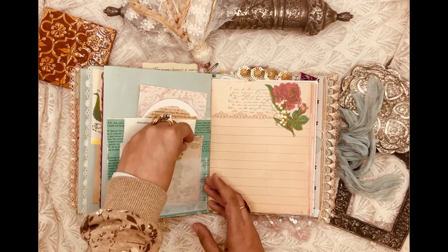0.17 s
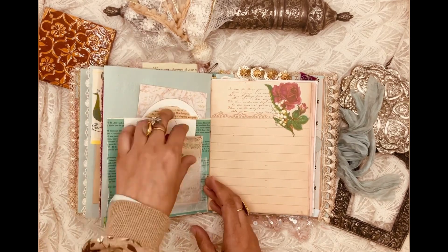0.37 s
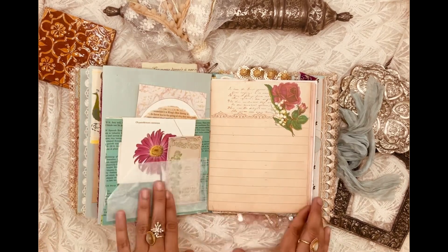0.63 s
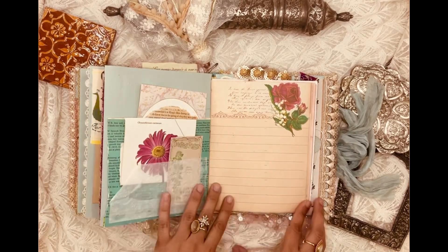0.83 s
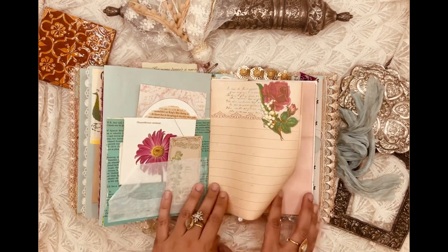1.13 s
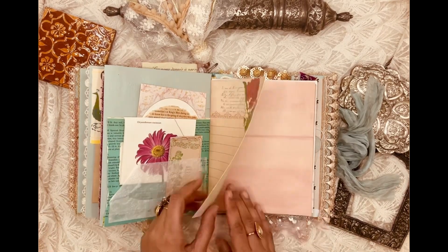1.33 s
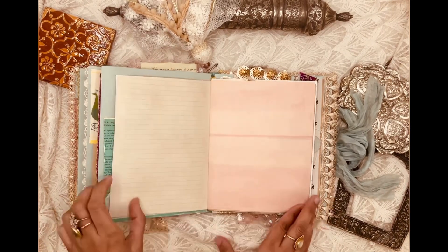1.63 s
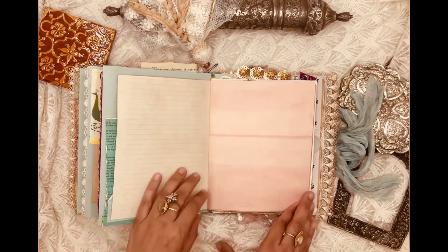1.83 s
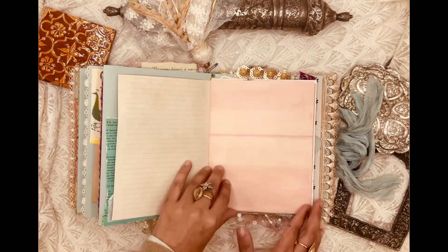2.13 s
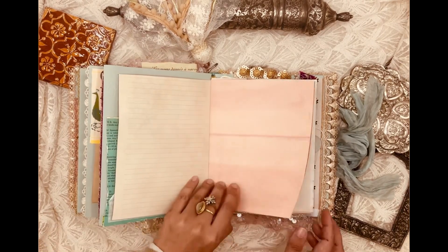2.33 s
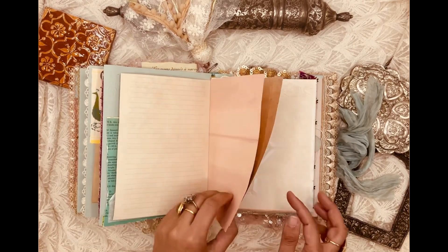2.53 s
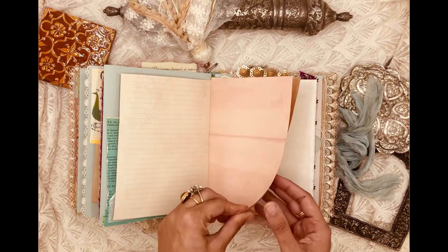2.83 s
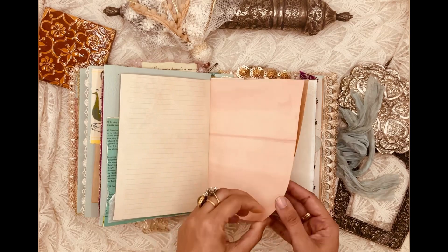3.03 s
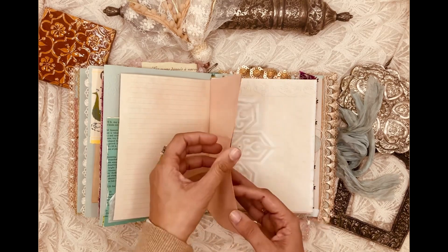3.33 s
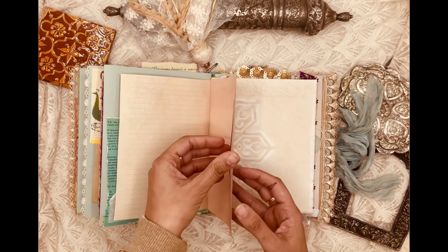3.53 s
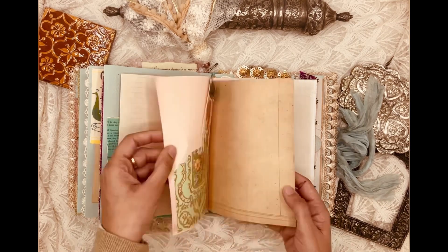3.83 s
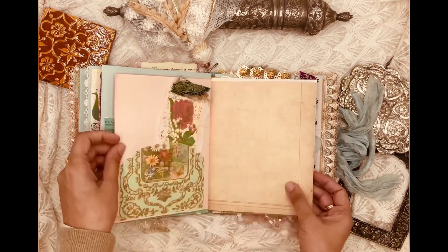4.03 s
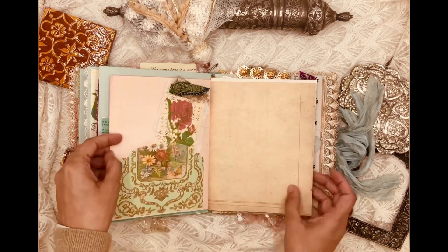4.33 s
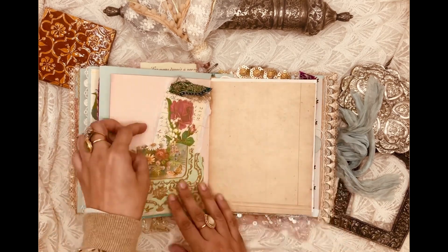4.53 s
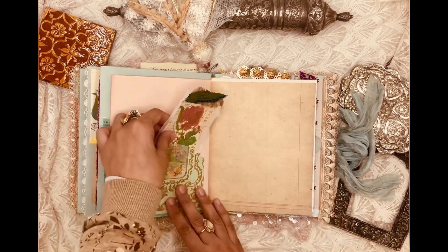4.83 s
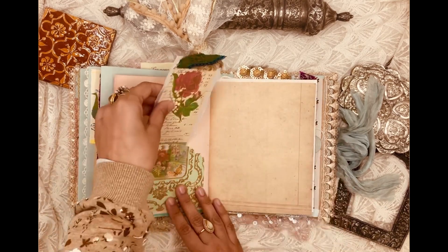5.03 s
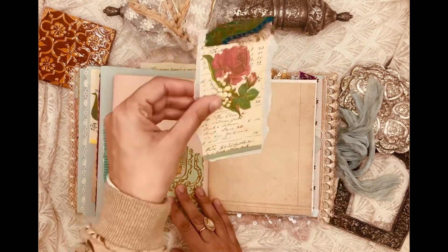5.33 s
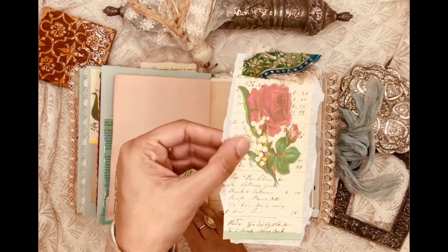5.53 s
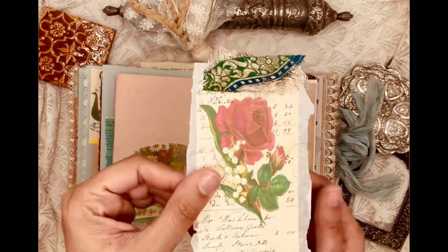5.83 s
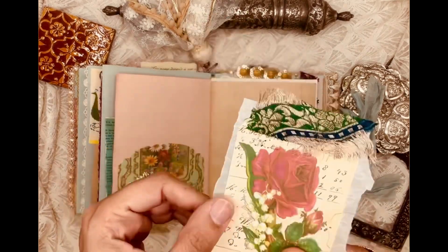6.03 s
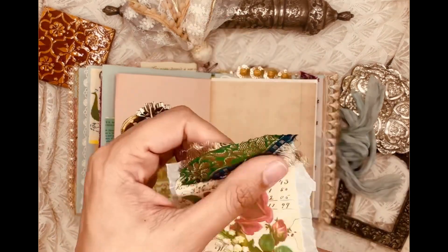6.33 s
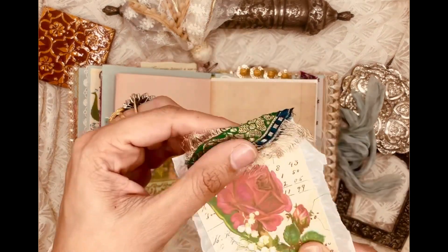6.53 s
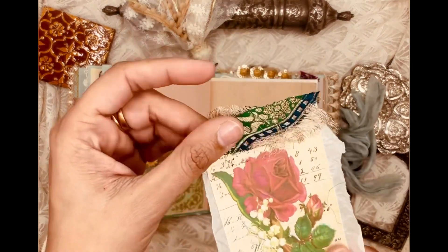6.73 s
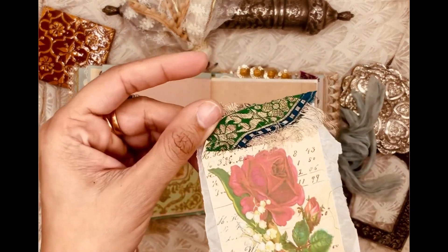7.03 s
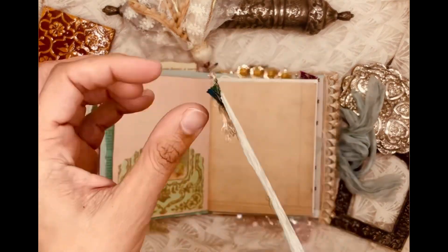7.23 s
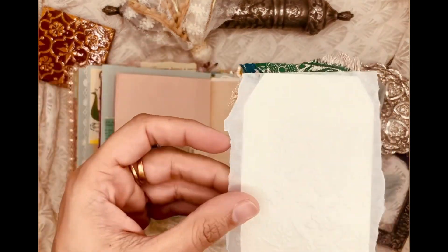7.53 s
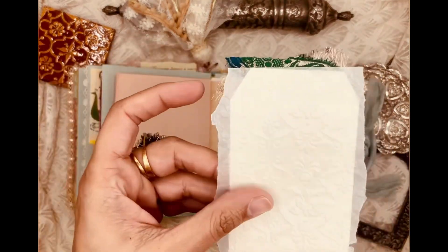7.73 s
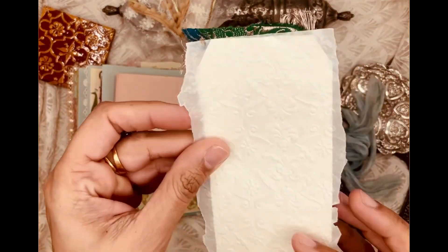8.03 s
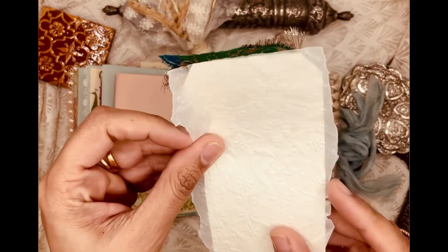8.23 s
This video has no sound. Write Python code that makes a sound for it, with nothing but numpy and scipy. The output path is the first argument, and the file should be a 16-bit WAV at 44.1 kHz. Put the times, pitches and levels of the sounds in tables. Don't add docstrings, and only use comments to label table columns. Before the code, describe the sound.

Quiet, dry paper handling on a cloth-covered table, heard close. Soft airy finger slides come first, then a loud crease snap as the page turns, more rubbing, and a crackling bend of a heavier sheet. After a quick flutter of page edges, a stiff card rustles, ticks and thuds softly, its corners cracking brightest at the end. Faint room hiss throughout.

```python
import sys
import numpy as np
from scipy import signal
from scipy.fft import rfft, irfft
from scipy.io import wavfile

SR = 44100
rng = np.random.default_rng(int(sys.argv[2]) if len(sys.argv) > 2 else 0)


def gain_from_decibels(decibels):
    exponent = np.asarray(decibels, float) / 20
    return 10 ** exponent


def materialize(psi):
    bounded = np.clip(np.atleast_2d(psi).T, -1, 1)
    quanta = np.round(bounded * 32767).astype(np.int16)
    wavfile.write(sys.argv[1], SR, quanta)


N = 369558
HOP = 40
BAND_EDGES_HZ = np.linspace(45 ** .35, 17500 ** .35, 62) ** (1 / .35)
BANDS_HZ = list(zip(BAND_EDGES_HZ, BAND_EDGES_HZ[1:]))


def at_hz(points, hz):
    points_hz, values = np.transpose(points)
    return np.interp(np.log(hz), np.log(points_hz), values)


def filtered(x, order, hz, kind):
    return signal.sosfilt(signal.butter(order, hz, kind, fs=SR, output="sos"), x)


def resonator(hz, width_hz):
    r = np.exp(-np.pi * width_hz / SR)
    return [1, -2 * r * np.cos(2 * np.pi * hz / SR), r * r]


def drift(rate_hz):
    r = np.exp(-2 * np.pi * rate_hz * HOP / SR)
    slow = signal.lfilter([1], [1, -2 * r, r * r], rng.standard_normal(N // HOP + 1002))[1000:]
    return slow / slow.std()


# hz, level_db_per_hz
ROOM_TONE = [(30, -17), (130, 9.5), (440, -9.5), (1000, -5), (2500, -10.5), (8000, -18), (16000, -29)]
ROOM_TONE_DB = -71


def room_hiss():
    noise, out = rng.standard_normal((2, N)), np.zeros(N)
    for k, (low_hz, high_hz) in enumerate(BANDS_HZ):
        level_db = ROOM_TONE_DB + at_hz(ROOM_TONE, np.sqrt(low_hz * high_hz))
        out += filtered(gain_from_decibels(level_db) * noise[k % 2], 2, [low_hz, high_hz], "band")
    return out


ZONES_HZ = [380, 1500, 4200, 11500]


def zone_weights(hz):
    share = np.array([np.interp(np.log(hz), np.log(ZONES_HZ), row) for row in np.eye(4)]) ** 2
    return share / share.sum()


ZONE_WIDTHS_HZ = [500, 2300, 5000, 8000]


def zone_density_db():
    return 10 * np.log10(SR / 2 / np.array(ZONE_WIDTHS_HZ))[:, None]


# start_s, length_s, touch_db, lift_db, airy_over_crisp_db
SLIDES = [(0.0, .035, -52, -64, 2), (.063, .04, -57, -55, 6), (.12, .105, -60, -56, .5),
          (.305, .03, -60, -58, 5), (.335, .02, -57, -55, 8), (.367, .008, -56, -57, 8),
          (.36, .07, -59, -64, 8), (.44, .11, -64, -56, 8), (.55, .25, -55, -71, 4),
          (.82, .025, -67, -68, 2), (.85, .08, -72, -78, .1), (.968, .07, -39, -41, -2),
          (1.04, .17, -43, -58, 2), (1.215, .02, -50, -45, .1), (1.25, .028, -37, -47, -22),
          (1.285, .035, -62, -66, -12), (1.33, .05, -55, -60, -1), (1.4, .065, -52, -51, .5),
          (1.465, .11, -50, -62, -3), (1.605, .045, -48, -57, 6), (1.66, .055, -68, -74, .1),
          (1.725, .26, -62, -59, 2), (1.99, .1, -63, -70, 3),
          (2.155, .25, -70, -64, 2), (2.43, .11, -45, -57, .1), (2.55, .11, -58, -62, .1),
                      (2.703, .05, -44, -55, -8), (2.76, .26, -55, -70, -5), (3.05, .12, -48, -53, -2),
                      (3.19, .03, -62, -56, -1), (3.24, .14, -51, -80, 2), (3.405, .01, -53, -56, .1),
                      (3.46, .09, -75, -84, 4), (3.67, .075, -72, -76, .1), (3.765, .13, -57, -53, -1),
                      (3.93, .18, -56, -72, .1), (4.13, .07, -66, -73, -1), (4.2, .1, -70, -61, -4),
                      (4.32, .04, -58, -52, 3), (4.36, .08, -54, -58, 2), (4.46, .15, -63, -68, 2),
                      (4.63, .16, -58, -64, 4), (4.82, .025, -62, -58, -4), (4.85, .17, -47, -56, .5),
                      (5.03, .04, -58, -63, 2), (5.095, .015, -53, -50, 3),
          (5.24, .1, -72, -62, -4), (5.35, .11, -64, -72, -8), (5.48, .38, -63, -68, -5),
               (5.87, .1, -62, -67, -3), (6.0, .03, -60, -51, -2), (6.035, .07, -62, -79, -2),
               (6.15, .11, -61, -67, -1), (6.29, .24, -60, -60, .1), (6.54, .065, -58, -57, -1),
               (6.65, .13, -58, -66, .1), (6.78, .04, -66, -64, 1), (6.86, .07, -75, -75, 1),
               (7.01, .178, -58, -58, 2), (7.2, .07, -68, -79, 3), (7.285, .07, -71, -66, 3),
               (7.36, .12, -64, -75, -1), (7.53, .17, -82, -69, .1), (7.745, .11, -63, -68, -1),
               (7.87, .08, -67, -58, 3), (7.95, .11, -56, -59, 6), (8.18, .03, -66, -63, 3),
               (8.31, .022, -50, -60, 1), (8.355, .03, -46, -52, -2)]
# start_s, length_s, touch_db, lift_db, airy_over_crisp_db
SUDDEN_SLIDES = [
    (2.68, .02, -50, -54, -8),
    (3.591, .055, -64, -71, -2),
    (6.62, .03, -58, -57, .1),
    (8.215, .03, -55, -51, 2.5),
    (8.292, .02, -56, -52, 1),
]
# middle_s, length_s, body_db, flex_over_body_db
BENDS = [(.48, .24, -66, -16), (.68, .11, -64, -4), (1.05, .02, -55, -20), (5.45, .04, -72, 6),
         (1.256, .016, -42, -14), (1.165, .06, -66, 4), (7.175, .04, -67, -8), (1.342, .025, -53, -10),
         (1.45, .2, -63, -8), (1.64, .01, -60, -4), (1.95, .11, -59, -4), (2.32, .1, -69, -11),
         (2.54, .06, -56, 3), (2.7, .02, -55, -11), (2.94, .17, -61, -6), (4.62, .09, -67, -9),
         (3.85, .18, -63, -9), (.86, .09, -71, 1.5), (4.44, .12, -65, -9), (5.075, .05, -61, -2),
         (5.33, .1, -62, -4), (5.52, .05, -58, 3), (5.65, .14, -65, -7), (5.78, .06, -59, -1),
         (5.91, .02, -65, 8), (6.01, .03, -61, -2), (6.56, .14, -62, -16), (3.65, .12, -75, -6),
         (8.056, .04, -70, 5), (8.14, .02, -71, -5), (8.37, .04, -57, 2)]
REST_DB = [-85, -88, -86, -85]
TOUCH_DB_PER_S, BITE_DB_PER_S, LIFT_DB_PER_S = 1000, 6000, 900
SLIDE_FLEX_DB, SLIDE_BODY_DB = -30, -13
SWELL_DB_PER_S, FADE_DB_PER_S = 800, 420


def rub_levels():
    s = np.arange(0, N / SR + .01, .001)
    power = gain_from_decibels(2 * np.array(REST_DB))[:, None] + 0 * s
    strokes = [(row, TOUCH_DB_PER_S) for row in SLIDES]
    strokes += [(row, BITE_DB_PER_S) for row in SUDDEN_SLIDES]
    for (start_s, length_s, touch_db, lift_db, airy_db), onset_db_per_s in strokes:
        end_s = start_s + length_s
        db = np.interp(s, [start_s, end_s], [touch_db, lift_db])
        db -= onset_db_per_s * np.maximum(start_s - s, 0)
        db -= LIFT_DB_PER_S * np.maximum(s - end_s, 0)
        power += gain_from_decibels(2 * (db + np.array([[SLIDE_FLEX_DB], [SLIDE_BODY_DB], [0], [airy_db]])))
    for middle_s, length_s, body_db, flex_db in BENDS:
        db = body_db - SWELL_DB_PER_S * np.maximum(middle_s - length_s / 2 - s, 0)
        db -= FADE_DB_PER_S * np.maximum(s - middle_s - length_s / 2, 0)
        power[:2] += gain_from_decibels(2 * (db + np.array([[flex_db], [0]])))
    return s, 10 * np.log10(power)


TEAR_GAIN, TEAR_S = .6, .0015


def grains(spread_db):
    x = rng.standard_normal((2, N)) * gain_from_decibels(spread_db * np.minimum(rng.exponential(1, N), 6))
    chance, size = rng.standard_normal((2, N))
    tears = signal.lfilter([1], [1, -np.exp(-1 / (TEAR_S * SR))], (chance > 3.3) * np.abs(size))
    return x / x.std() * (1 + TEAR_GAIN * tears)


# hz, level_db
COLOUR = [(60, -34.5), (110, -2), (460, -1), (570, -8.5), (800, 1.5), (1030, -4), (1700, 3), (2050, -1),
          (2500, 0), (5600, -1), (6800, 4.5), (10000, 2.5), (15500, 1.5)]


def rubbing(bends):
    s, zone_db = rub_levels()
    zone_db = zone_db + zone_density_db()
    fibres = grains(spread_db=3.0)
    grip, flexing = 1.6 * drift(60), 2 * drift(11)
    steps_s, fine_s = np.arange(len(grip)) * HOP / SR, np.arange(N) / SR
    out = np.zeros(N)
    for k, ((low_hz, high_hz), bend) in enumerate(zip(BANDS_HZ, bends)):
        hz = np.sqrt(low_hz * high_hz)
        share = zone_weights(hz)
        level_db = np.interp(steps_s, s, share @ zone_db) + at_hz(COLOUR, hz) - 2.5
        level_db += grip + flexing * share[0] + 2.4 * bend
        shake = np.interp(fine_s, steps_s, gain_from_decibels(level_db)) * fibres[k % 2]
        out += filtered(shake, 2, [low_hz, high_hz], "band")
    return out


def bursts(t60s, cracks, rise_s):
    age_s = np.arange(int(.09 * SR)) / SR
    rattle = gain_from_decibels(-60 * age_s / np.clip(t60s, .004, .2)[:, None]) * rng.standard_normal((len(t60s), len(age_s)))
    rattle *= (1 - np.exp(-age_s / rise_s)) * (1 + np.exp(-age_s / 0.001))
    rattle[:, 8] += cracks * rng.choice([-1, 1], len(t60s))
    return rattle


# start_s, crisp_db, airy_over_crisp_db, body_over_crisp_db
SNAPS = [(.557, -56, 10, -3), (.6236, -61, 21, 4), (1.2352, -45, -4, -17), (1.2419, -37, -16, -1),
         (1.2535, -36, -22, -1), (1.634, -46, 6.5, -4), (1.6757, -71, 16, 4), (1.9304, -62, 13, 4),
         (2.149, -78, 15, -9), (2.3524, -57.5, -13, 3.5), (2.8388, -31, -10, 3.5),
         (2.901, -34.5, -6, 1), (2.9752, -39.5, .5, 5), (3.0012, -34, -10, 2),
         (3.0387, -45, 2.5, -1.5), (3.41, -62.5, 5, -21), (3.5357, -70.5, .1, -3),
         (3.592, -60, -3, -12), (3.6606, -48, -50, 2.5), (3.7725, -62, 7.5, 2), (3.803, -48.5, -8, -2),
         (4.0036, -65.5, -2, 9), (4.1283, -65.5, -2, -4),
         (4.282, -44.5, -10, -13), (4.4434, -34, -1.5, -15.5), (4.5439, -55, 2, 1.5),
                (4.5738, -65, 5.5, .1), (4.631, -71, 10, -3), (4.7876, -54, -4, -19),
                (4.834, -47, -26, -25), (5.096, -49, -12, .5), (5.2378, -68, .1, -4.5),
                (5.2488, -50, -30, -3.5), (5.3655, -71, -9, 16), (5.4446, -59.5, 1.5, -4),
                (5.479, -74, -3, 22), (5.552, -54.5, -12, -1.5), (5.8753, -66, -11, 14),
                (5.897, -53, -18, .1), (5.9811, -41.5, -2.5, -22.5), (6.011, -55.5, 4.5, -3),
                (6.022, -47, -24, -11), (6.043, -54, -2, -8), (6.1555, -60, -13, -16),
         (6.372, -55, 1, -27), (6.43, -57, -8, -33), (6.5059, -57, -25, -16), (6.7043, -52.5, 1, 10.5),
              (6.8323, -46, -9, -25), (6.886, -58, 2.5, -27), (6.9679, -65, -11, -1),
              (6.9783, -54, -11, -8), (6.9873, -47, 3, -1), (7.0626, -52.5, -2, -6), (7.282, -80, 18, -14),
              (7.3793, -56.5, -10, -4), (7.3895, -47.5, 3.5, -3.5), (7.6039, -70.5, 3, -7.5),
              (7.737, -68.5, 5, -17), (7.8119, -60, .1, -29), (7.8564, -53.5, 3.5, -2),
              (7.8784, -54, 5.5, -5), (7.9282, -48, 3.5, 3.5), (8.0245, -41.5, 10, -6),
              (8.04, -46.5, -7, -19), (8.0725, -41, -2, -28), (8.0985, -47.5, 10.5, 2),
              (8.137, -52, -6, -13), (8.1452, -52, 5, -36), (8.161, -56, -4, -19), (8.311, -52, -8, -11),
              (8.3376, -53, 4, -16), (8.3538, -39, 6.5, -5), (8.3628, -47, 7, -26)]
SNAP_RING_S, RING_S_PER_BODY_DB = .038, -.0003


def snapping(bends):
    start_s, crisp, airy, body = np.transpose(SNAPS)
    zone_db = crisp + np.array([body - 26, body + .1, 0 * crisp, airy + 0.068]) + zone_density_db()
    cracks = 4.5 * gain_from_decibels(.5 * np.clip(airy - body, -12, 14))
    releases = bursts(SNAP_RING_S + RING_S_PER_BODY_DB * body, cracks, rise_s=.0004)
    starts = np.round(start_s * SR).astype(int)
    snaps = np.zeros_like(releases)
    for (low_hz, high_hz), bend in zip(BANDS_HZ, bends):
        hz = np.sqrt(low_hz * high_hz)
        level_db = zone_weights(hz) @ zone_db + at_hz(COLOUR, hz) - 5.5
        level_db += 3.23 * bend[starts // HOP] + 2 * rng.standard_normal(len(starts))
        band = signal.butter(1, [low_hz, high_hz], "band", fs=SR)
        snaps += gain_from_decibels(level_db)[:, None] * signal.lfilter(*band, releases)
    snaps = filtered(snaps, 2, 420, "high")
    out = np.zeros(N + SR)
    for start, snap in zip(starts, snaps):
        out[start:start + len(snap)] += snap
    return out[:N]


def paper():
    bends = [drift(7.2) for _ in BANDS_HZ]
    return rubbing(bends) + snapping(bends)


# start_s, peak_db, patch_hz, ring_s
TICKS = [(0.3137, -38, 6490, 0.014), (0.3444, -35, 11000, 0.014), (0.3694, -36, 11000, 0.014),
         (0.5754, -33, 11000, 0.014), (0.8174, -49, 10100, 0.014), (0.8344, -56, 6620, 0.014),
         (1.2544, -20, 1780, 0.014), (1.2624, -28, 1580, 0.014), (1.2694, -32, 1520, 0.014),
         (1.3404, -39, 2290, 0.014), (2.6813, -35, 4170, 0.014), (2.7043, -31, 3210, 0.014),
         (3.1522, -34, 7430, 0.014), (3.5349, -59, 2440, 0.014), (3.6144, -58, 3700, 0.014),
         (3.6344, -59, 8850, 0.014), (3.6601, -40, 1800, 0.014), (3.7864, -41, 8070, 0.014),
         (3.8033, -37, 1530, 0.014), (5.5508, -40, 1810, 0.014), (5.6685, -48, 2670, 0.014),
         (6.2851, -43, 7440, 0.014), (6.3964, -39, 6300, 0.014), (6.4288, -40, 6510, 0.014),
         (6.5051, -42, 3090, 0.014), (6.538, -38, 7070, 0.014), (6.557, -36, 2280, 0.014),
         (6.5814, -40, 6760, 0.014), (6.6004, -39, 7950, 0.014), (6.6204, -42, 6880, 0.014),
         (6.6374, -40, 6850, 0.014), (6.6894, -38, 6270, 0.014), (6.7032, -29, 2610, 0.014),
         (7.1077, -41, 6310, 0.014), (7.64, -54, 7100, 0.014), (8.2064, -48, 7320, 0.014),
         (8.2142, -34, 6970, 0.014), (8.2914, -37, 7400, 0.014), (8.306, -34, 6730, 0.014),
         (8.0808, -28, 4950, .01), (1.2415, -17, 2760, .03), (1.2435, -21, 3500, .04),
          (1.2545, -21, 3050, .03), (1.322, -42, 4400, .04), (6.8318, -21, 6900, .02),
          (6.832, -32, 2700, .025), (8.0615, -36, 3500, .012), (8.094, -31, 2200, .01),
          (8.0987, -13, 12000, .006), (8.3535, -4, 11600, .005), (8.3712, -14, 9980, .006),
          (1.2535, -19, 1800, .025), (5.9812, -23, 4600, .012), (7.055, -38, 2700, .02),
          (7.066, -44, 1500, .02), (1.046, -36, 1200, .02)]
TICK_SHARPNESS, TICK_DB = 4.0, -7


def ticks():
    out, age_s = np.zeros(N + SR), np.arange(SR // 12) / SR
    for start_s, peak_db, patch_hz, ring_s in TICKS:
        rattle = rng.standard_normal(len(age_s))
        push = rattle * gain_from_decibels(-60 * age_s / np.clip(ring_s, .003, .1)) + 5.0 * (age_s == 0)
        tick = signal.lfilter([1, 0, -1], resonator(patch_hz, patch_hz / TICK_SHARPNESS), push)
        tick = tick / np.abs(tick).max() + .06 * np.diff(push, prepend=0)
        out[round(start_s * SR):][:len(age_s)] += gain_from_decibels(peak_db + TICK_DB) * tick
    return out[:N]


# start_s, peak_db, pitch_hz, ring_s
THUMPS = [(0.846, -66.5, 149, 0.077), (0.925, -63.5, 151, 0.055), (1.02, -62, 129, 0.12),
          (1.137, -51, 750, 0.03), (1.177, -55, 458, 0.02), (1.247, -54.5, 700, 0.072),
          (1.646, -54, 460, 0.025), (1.768, -61, 286, 0.029), (2.549, -68, 700, 0.083),
          (2.552, -52.5, 460, 0.07), (2.683, -57, 124, 0.047), (2.998, -55, 685, 0.074),
          (4.447, -61.5, 500, 0.076), (5.046, -62.5, 463, 0.06), (5.426, -55.5, 280, 0.032),
          (5.478, -41.5, 760, 0.045), (5.788, -48, 140, 0.07), (5.898, -57, 426, 0.037),
          (6.009, -47.5, 308, 0.032), (6.703, -42, 400, 0.032), (6.884, -48, 186, 0.045),
          (6.99, -47, 320, 0.03), (7.394, -54.5, 417, 0.039), (7.727, -65, 244, 0.039),
          (7.873, -45.5, 330, 0.029), (7.925, -57, 663, 0.035), (8.029, -47, 370, 0.024),
          (8.137, -53, 304, 0.028), (8.214, -60.5, 278, 0.029), (8.308, -58.5, 308, 0.042),
          (6.708, -60, 460, .09), (6.996, -61, 120, .07), (6.705, -48, 240, .035), (8.03, -58, 180, .05),
          (8.06, -67, 110, .09), (8.354, -60, 320, .05), (1.25, -58, 300, .06)]


def thumps():
    out, age_s = np.zeros(N + SR), np.arange(SR // 5) / SR
    puffs = filtered(rng.standard_normal((len(THUMPS), len(age_s))), 2, [170, 1000], "band")
    for (start_s, peak_db, pitch_hz, ring_s), puff in zip(THUMPS, puffs):
        thump = np.sin(2 * np.pi * pitch_hz * age_s) + 3.1 * puff
        thump *= gain_from_decibels(-60 * age_s / max(ring_s, .01)) * (1 - np.exp(-age_s / 0.0025))
        out[round(start_s * SR):][:len(age_s)] += gain_from_decibels(peak_db + 6) * thump
    return out[:N]


# pitch_hz, level_db, t60_s
RIFFLE_MODES = [(1500, -1, .008), (3800, 1, .009), (5000, -1.5, .007), (7200, -1.5, .005)]
RIFFLE_S, RIFFLE_STEP_S, RIFFLE_DB = 4.2052, .0152, -54


def riffle():
    out, age_s = np.zeros(N), np.arange(SR // 20) / SR
    for k in range(4):
        rattle = rng.standard_normal(len(age_s)) * np.exp(-age_s / .004)
        tick = 6 * (age_s == 0) + rattle / 4
        flick = 1.1 * rattle
        for pitch_hz, level_db, t60_s in RIFFLE_MODES:
            ring = gain_from_decibels(level_db - 60 * age_s / t60_s) * np.sin(2 * np.pi * pitch_hz * age_s)
            flick += .35 * np.convolve(tick, ring)[:len(age_s)]
        start_s = RIFFLE_S + k * RIFFLE_STEP_S
        out[round(start_s * SR):][:len(age_s)] += gain_from_decibels(RIFFLE_DB + k) * flick
    return filtered(out + 1e-18, 3, 1000, "high")


# pitch_hz, width_hz, level_db
BOOK_MODES = [(460, 18.4, -1), (700, 17, -6.5), (1826, 25, -14), (2420, 62, -14.5)]


def book(x):
    out = x.copy()
    for pitch_hz, width_hz, level_db in BOOK_MODES:
        gain = (1 - np.exp(-2 * np.pi * width_hz / SR)) / 2
        out += gain_from_decibels(level_db) * signal.lfilter([gain, 0, -gain], resonator(pitch_hz, width_hz), x)
    return out


ROOM_T60_S, ROOM_DB = 0.056, -23


def room(x):
    age_s = np.arange(SR // 3) / SR
    tail = rng.standard_normal(len(age_s)) * gain_from_decibels(-60 * age_s / ROOM_T60_S) * (age_s > .004)
    tail = signal.lfilter([.5], [1, -.5], tail)
    return signal.fftconvolve(x, tail / np.sqrt(np.sum(tail ** 2)))[:N]


def scene():
    near = book(room_hiss() + paper() + ticks() + thumps() + riffle())
    return (near + gain_from_decibels(ROOM_DB) * room(near))[None]


def top_cut(x):
    return signal.sosfilt(signal.butter(12, 16840, fs=SR, output="sos"), x)


STEP_HZ, STEP_DB, CUTOFF_HZ = 15800, -23, 16900


def record(dry):
    x = filtered(dry, 4, 80, "high")
    x = signal.sosfilt(signal.cheby2(12, 70, CUTOFF_HZ, fs=SR, output="sos"), x)
    step = np.where(np.arange(N // 2 + 1) * SR / N > STEP_HZ, gain_from_decibels(STEP_DB), 1)
    return top_cut(irfft(rfft(x) * step, N))


dry = scene()
out = record(dry)
materialize(out)
```